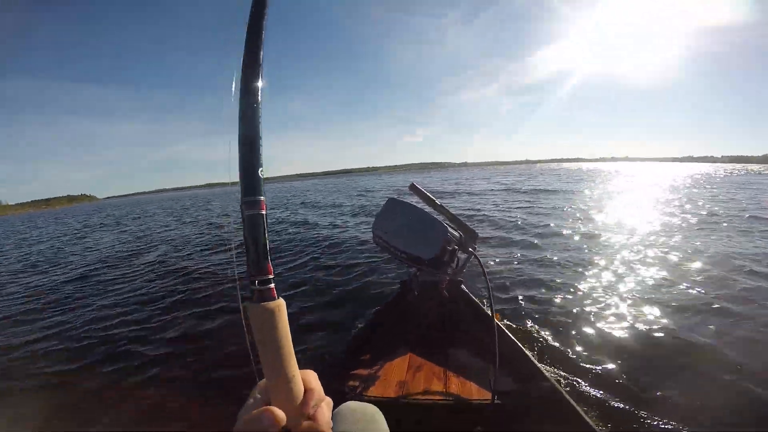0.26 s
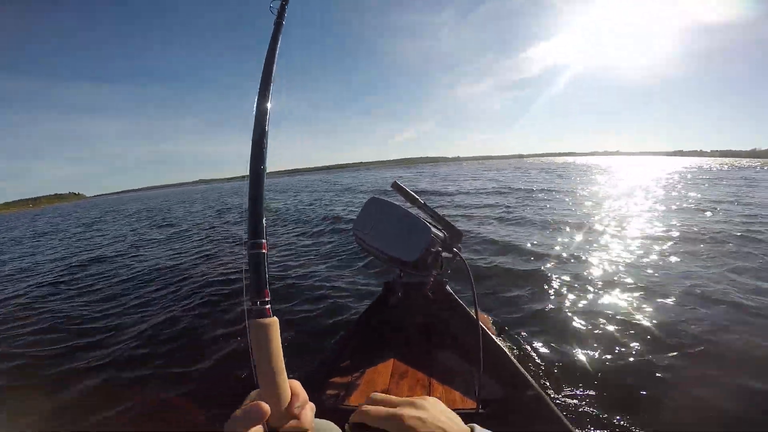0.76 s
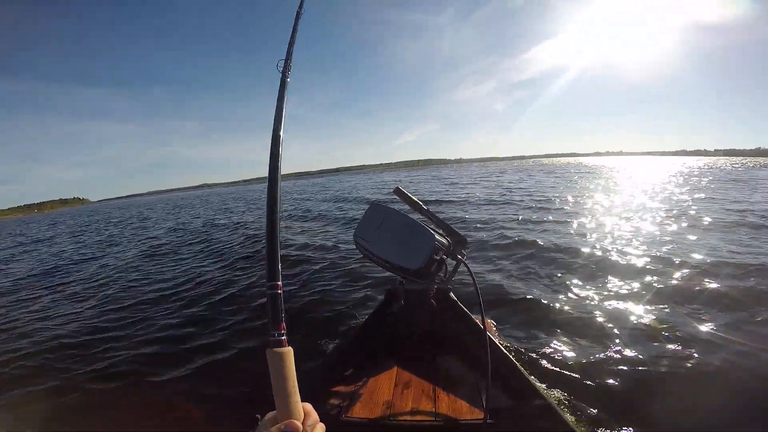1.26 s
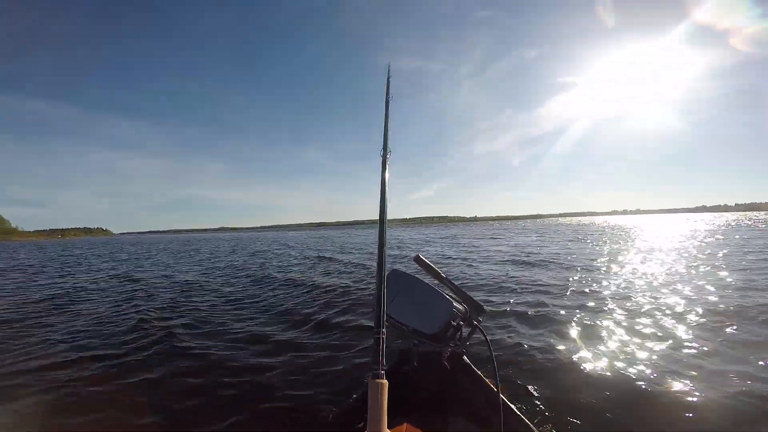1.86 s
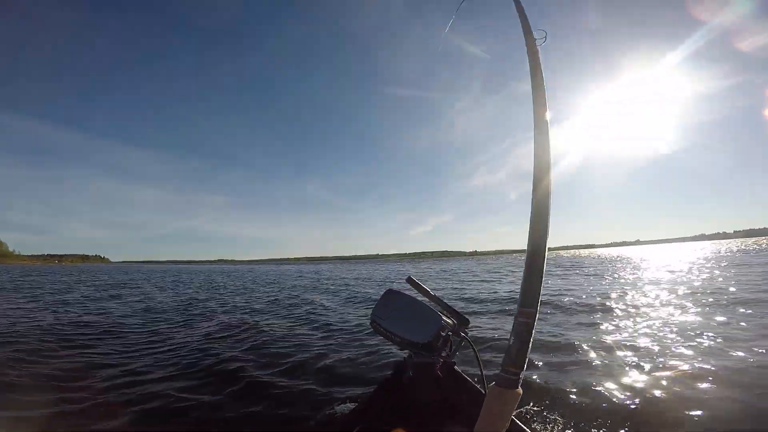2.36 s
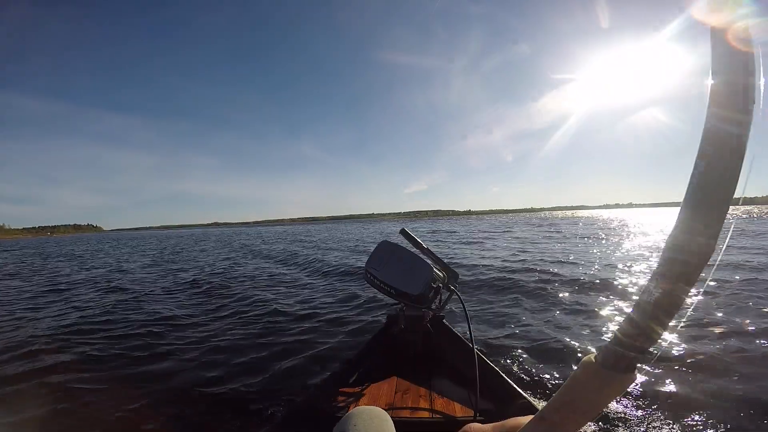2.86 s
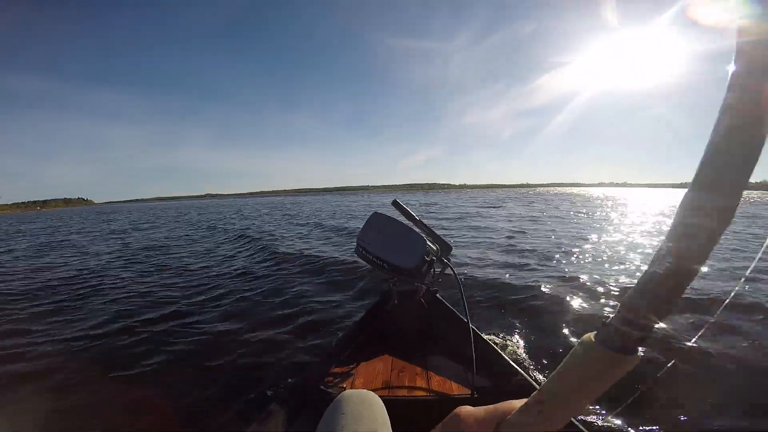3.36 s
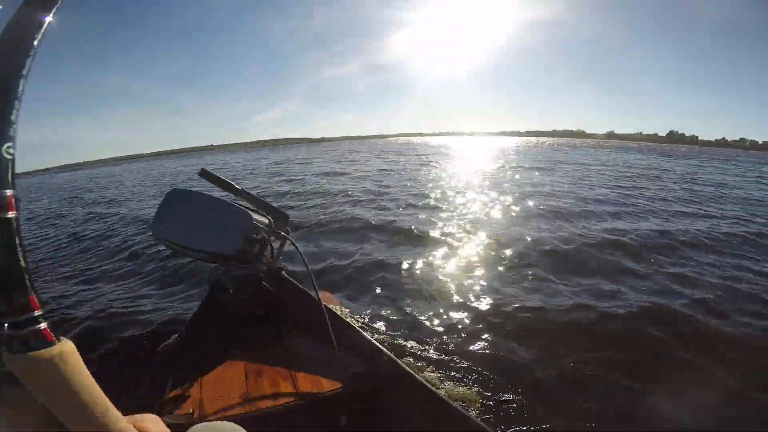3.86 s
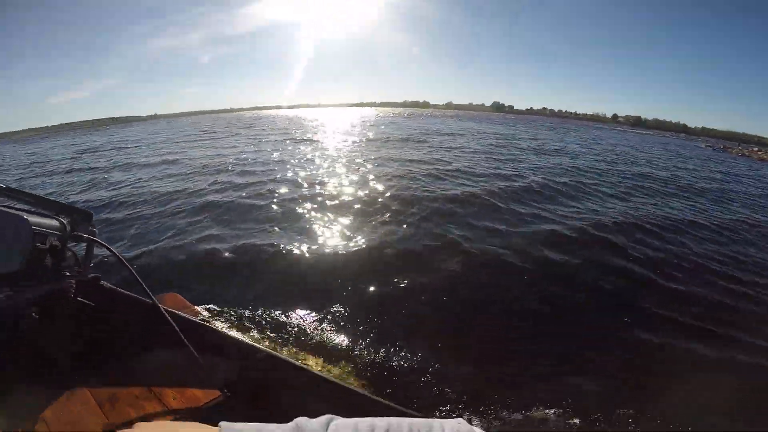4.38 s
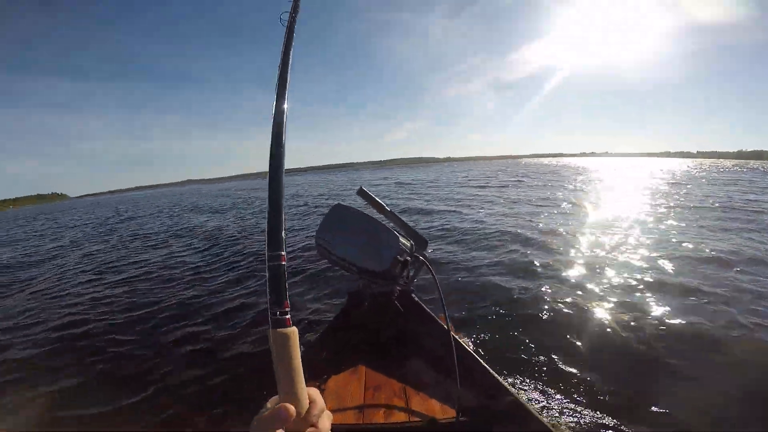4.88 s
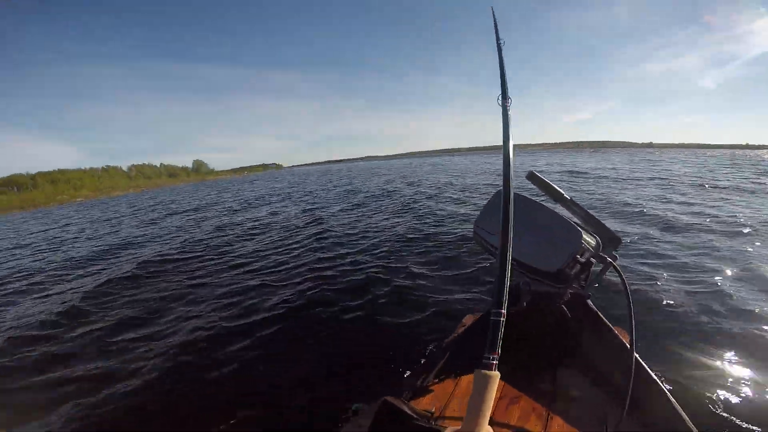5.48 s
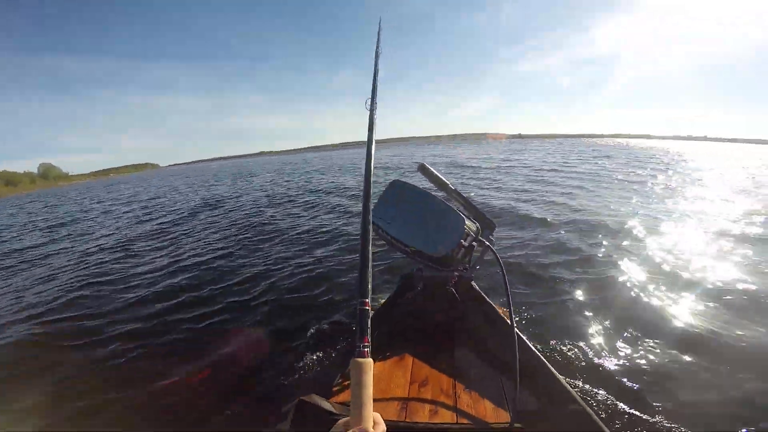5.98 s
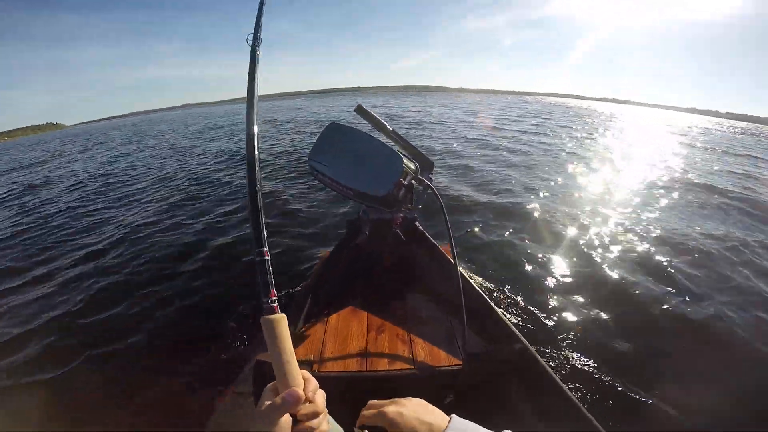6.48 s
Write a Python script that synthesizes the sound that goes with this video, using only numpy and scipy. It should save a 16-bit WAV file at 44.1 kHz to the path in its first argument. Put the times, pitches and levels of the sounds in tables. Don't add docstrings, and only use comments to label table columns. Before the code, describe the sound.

A fishing reel clicker buzzes metallically as line runs out, stops, then screams again, over gusty wind thumps and water plopping along a small boat's hull.

```python
import sys
import numpy as np
from scipy import signal
from scipy.fft import rfft, irfft, next_fast_len
from scipy.io import wavfile
from scipy.ndimage import uniform_filter1d, map_coordinates

SR = 44100
rng = np.random.default_rng(int(sys.argv[2]) if len(sys.argv) > 2 else 0)


def waveform_to_disk(signal):
    frames = np.transpose(np.atleast_2d(signal))
    scaled = np.clip(frames, -1, 1) * 32767
    samples = np.round(scaled).astype(np.int16)
    wavfile.write(sys.argv[1], SR, samples)


def linear_from_db(decibels):
    return 10 ** (np.asarray(decibels, float) / 20)


N = 296793
TIME = np.arange(N) / SR

# t/s, pull/dB, rod swing/0-1, camera turned away/0-1
HOLD = [(0.0, -39, 0.28, 0), (0.68, -39, 0.24, 0.26), (1.2, -41.5, 0.24, 0.18), (1.75, -42, 0.12, 0.25),
        (2.1, -47, 0.17, 0.02), (3.54, -37.5, 0.15, 0.14), (3.62, -42, 0.34, 0.1),
        (3.67, -36.5, 0.67, 0.26), (3.76, -37, 0.64, 0.03), (3.88, -38.5, 0.25, 0),
        (4.15, -39.5, 0.13, 0.83), (4.55, -39, 0.17, 0.87), (4.7, -40.5, 0.17, 0.26),
        (5.1, -40, 0.22, 0.14), (5.45, -42, 0.8, 0.16), (6.1, -42, 0.23, 0.24), (6.4, -42.5, 0.02, 0.04),
        (6.73, -43, 0.1, 0)]


def unit(x):
    return x / np.sqrt(np.mean(x ** 2) + 1e-20)


def curves(rows):
    s, *cols = np.transpose(rows)
    return [np.interp(TIME, s, c) for c in cols]


def wobble(rate):
    return map_coordinates(rng.standard_normal(int(N * rate / SR) + 4), [TIME * rate])


def filtered(x, response):
    m = next_fast_len(N + SR // 2)
    return irfft(rfft(x, m) * response(np.fft.rfftfreq(m, 1 / SR)), m)[:N]


def coloured(spectrum):
    hz, db = np.transpose(spectrum)
    response = lambda f: linear_from_db(np.interp(np.log(f + 1), np.log(hz), db))
    return unit(filtered(rng.standard_normal(N), response))


def ring(x, pitch_hz, width_hz):
    return signal.lfilter(*signal.iirpeak(pitch_hz, pitch_hz / width_hz, SR), x)


def resonant(x, modes):
    return sum((-1) ** k * linear_from_db(db) * ring(x, hz, width_hz) for k, (hz, width_hz, db) in enumerate(modes))


def placed(events, shape):
    out = np.zeros(N + SR)
    for row in events:
        sound = shape(row)
        out[round(row[0] * SR):][:len(sound)] += sound
    return out[:N]


def peaks(rows, rise_db_s, fall_db_s):
    total = 0
    for s, held_s, db in rows:
        before_s = np.maximum(s - TIME, 0)
        after_s = np.maximum(TIME - s - held_s, 0)
        total = total + linear_from_db(2 * (db - rise_db_s * before_s - fall_db_s * after_s))
    return total


def speed():
    # start/s, stop/s
    line_runs = [
        (0, 2.057),
        (3.533, 6.4),
        (6.514, 6.73),
    ]
    fastest_s = [
        [-.19, .03, .25, .46, .675, .885, 1.09, 1.3, 1.53, 1.72, 2.1],
        [3.33, 3.69, 3.89, 4.09, 4.29, 4.49, 4.68, 4.88, 5.075, 5.27, 5.485, 5.72, 5.98, 6.22, 6.6],
        [6.27, 6.54, 6.84],
    ]
    teeth_per_turn = 50
    surge_share, second_harmonic_share = .13, .04
    rate, surge = np.zeros((2, N))
    for (start, stop), turns in zip(line_runs, map(np.array, fastest_s)):
        running = (TIME >= start) * (TIME < stop)
        angle = 2 * np.pi * np.interp(TIME, turns, np.arange(len(turns)))
        swing = (surge_share * np.cos(angle) + second_harmonic_share * np.cos(2 * angle)) * running
        mean_rate = np.interp(TIME, (turns[1:] + turns[:-1]) / 2, teeth_per_turn / np.diff(turns))
        rate += mean_rate * (1 + swing) * running
        surge += swing
    return rate, surge


def beamed(x, part, aim_hz):
    spread = .09
    flutter_db, flutter_per_s = 2.5, 14
    gains = [linear_from_db(db) * (np.exp(-((aim_hz / hz - 1) / spread) ** 2) + .2) for hz, width_hz, db in part]
    total = np.sqrt(sum(g * g * width_hz for g, (hz, width_hz, db) in zip(gains, part)))
    out = np.zeros(N)
    for k, (gain, (hz, width_hz, db)) in enumerate(zip(gains, part)):
        flicker = linear_from_db(flutter_db * wobble(flutter_per_s))
        tone = ring(ring(x, hz, 4 * width_hz), hz, width_hz)
        out += (-1) ** k * gain * flicker * tone
    return unit(out / total)


def reel():
    # t/s, peak/dB
    lone_teeth = [(2.066, -26), (2.079, -31), (2.099, -27), (3.509, -41), (3.5154, -32), (3.5244, -31.5),
                  (6.41, -29), (6.4194, -30), (6.4617, -53), (6.4939, -27.5), (6.5051, -24.5)]
    # f/Hz, width/Hz, level/dB
    frame_modes = [(2740, 93, -7.5), (3090, 220, -11), (3703, 190, 1.5), (4020, 500, 2), (4353, 175, 7.5)]
    spool_modes = [(4825, 203, 2), (5370, 113, -4.5), (5730, 187, -3.5), (6610, 680, -0.5)]
    spring_modes = [(7046, 228, 0), (7857, 570, -4.5), (8590, 240, 2.5), (8950, 390, 0.5), (10340, 920, -2)]
    edge_modes = [(11440, 380, -0.3), (12100, 1050, -1.4), (13300, 430, 0.58), (14100, 1000, 2),
                  (15400, 1300, -0.78)]
    # over pull/dB, per swing/dB, per turning away/dB, per share of surge/dB
    part_levels = [
        (-0.5, 2, -12.5, 16),
        (0, 0, -0.5, -2),
        (-1, 5, 0.5, 8),
        (-14.5, -1, -0.5, 11),
    ]
    # at rest/Hz, per swing/Hz, per turning away/Hz
    beam_pitches = [
        (5133, -50, 328),
        (7100, 1200, -100),
        (11960, 500, 1200),
    ]
    # t/s, strength/0-1
    jerk_events = [
        (0.0, 0.03),
        (3.52, 0.9),
        (6.5, 0.25),
    ]
    jerk_gains = [0.5, 6.5, 0.5, -4]
    jerk_decay_s, jerk_spool_hz = 0.13, 495
    scatter_db, jitter_s = 1.7, .00003
    proud_every, proud_db = 6, 1.5
    spool_gear_db, edge_gear_db = 3.5, 3
    rattle_s, rattle_rise_s, hull_s = .003, 0.00037, .045

    rate, surge = speed()
    at = np.flatnonzero(np.diff(np.floor(np.cumsum(rate) / SR)))
    at = np.concatenate([at, [round(s * SR) for s, db in lone_teeth]])
    luck = rng.standard_normal((len(at), 2))
    proud = np.arange(len(at)) % proud_every == 0
    size = linear_from_db(scatter_db * luck[:, 0] + proud_db * proud)
    size = size / np.sqrt(np.maximum(rate[at], 110) / 200)
    size[-len(lone_teeth):] = linear_from_db([db + 30.5 for s, db in lone_teeth])
    at = np.clip(at + (jitter_s * SR * luck[:, 1]).astype(int), 0, N - 1)
    teeth = np.bincount(at, size, N)

    t = TIME[:600]
    shape = linear_from_db(-60 * t / rattle_s) * (1 - np.exp(-t / rattle_rise_s))
    flick = signal.fftconvolve(teeth, shape)[:N]
    burst = rfft(shape * rng.standard_normal(len(t)))
    repeated = np.linalg.norm(shape) * irfft(burst / np.abs(burst))
    same = signal.fftconvolve(teeth, repeated)[:N]
    hull_power = signal.fftconvolve(teeth ** 2, linear_from_db(-120 * TIME[:3000] / hull_s))[:N]
    answer = np.sqrt(np.abs(hull_power))

    def blows(wet_db):
        return 1.1 * same + (.6 * flick + linear_from_db(wet_db) * answer) * rng.standard_normal(N)

    pull_db, swing, away = curves(HOLD)
    jerk = np.zeros(N)
    for s, strength in jerk_events:
        jerk += strength * np.exp(-np.abs(TIME - s) / jerk_decay_s) * (TIME > s)
    frame_db, spool_db, spring_db, edge_db = (
        pull_db + db + a * swing + b * away + c * surge + d * jerk
        for (db, a, b, c), d in zip(part_levels, jerk_gains))
    gear = np.cos(2 * np.pi * np.cumsum(rate) / SR / proud_every)
    spool_db = spool_db + spool_gear_db * gear
    edge_db = edge_db + edge_gear_db * gear
    spool_hz, spring_hz, edge_hz = (hz + a * swing + b * away for hz, a, b in beam_pitches)
    spool_hz = spool_hz + jerk_spool_hz * jerk

    frame = linear_from_db(frame_db - 0.5) * unit(resonant(blows(wet_db=-16.5), frame_modes))
    spool = linear_from_db(spool_db + 1.5) * beamed(blows(wet_db=-25), spool_modes, spool_hz)
    spring = linear_from_db(spring_db - 0.5) * beamed(blows(wet_db=-22.5), spring_modes, spring_hz)
    edge = linear_from_db(edge_db + 3.0) * beamed(blows(wet_db=-24), edge_modes, edge_hz)
    return frame + spool + spring + edge


def thump(row):
    s, suck_db, swing_back_db = row
    dip_s, sink_s, release_s = .011, 0.0049, 0.0021
    ring_hz, ring_s, ring_rise_s = 24, .05, 0.0024
    t = TIME[:SR // 4]
    late = np.maximum(t - dip_s, 0)
    dip = -np.exp(-np.where(t < dip_s, ((t - dip_s) / sink_s) ** 2, (late / release_s) ** 2))
    swell = np.exp(-late / ring_s) * (1 - np.exp(-late / ring_rise_s))
    swing_back = linear_from_db(swing_back_db) * np.sin(2 * np.pi * ring_hz * late) * swell
    return linear_from_db(suck_db + 4) * (dip + swing_back)


def wind():
    # f/Hz, density/dB per Hz
    buffet_spectrum = [(7.1, -18), (12, 1.5), (27, 2), (37, -0.5), (46, -9.5), (60, -16), (123, -58),
                       (209, -41), (300, -50.5), (390, -104), (660, -120)]
    hiss_spectrum = [(60, 6.5), (150, 2), (300, -6), (450, -7.5), (610, -4.5), (800, -11.5), (1030, -4),
                     (1250, -11.5), (1470, -6.5), (2100, -12), (2650, -10.5), (3400, -20), (6000, -38)]
    # t/s, suck/dB, swing-back over suck/dB
    drops = [(0.002, -30, 18), (0.354, -36, 17), (0.436, -32, 17), (0.504, -36, 17), (0.572, -32, 18.5),
             (0.853, -35, 16), (1.394, -38, 14), (1.486, -37.5, 13.5), (1.577, -30.5, 20),
             (1.786, -34, 14.5), (2.924, -39, -4), (3.748, -36, 17), (3.839, -22, 8), (4.188, -23.5, 16),
             (4.382, -16, 7.5), (4.575, -22.5, 14), (4.671, -29.5, 14), (4.795, -36, 13),
             (4.864, -33.5, 14.5), (5.035, -36, 14), (5.121, -17.5, 9.5), (5.259, -33.5, 13),
             (5.44, -54, 2), (5.821, -31, 3), (5.998, -18.5, 10.5), (6.215, -37.5, -4), (6.512, -28, 9.5),
             (6.609, -17.5, 9)]
    # t/s, peak/dB
    cover_snaps = [
        (3.7938, -39),
        (3.843, -15),
        (4.404, -18),
        (4.4375, -10.5),
        (4.6003, -13.5),
        (4.6307, -15),
        (6.6586, -24),
        (6.695, -14),
    ]
    # t/s, strength/dB
    breeze_curve = [(0.0, -26.5), (0.3, -25.5), (0.55, -23.5), (1.2, -30), (1.4, -40), (1.6, -22),
                    (2.0, -30), (2.2, -42), (2.55, -38), (3.4, -42), (3.85, -22), (4.14, -27), (4.5, -25.5),
                    (5.2, -20), (5.64, -38.5), (5.9, -28.5), (6.2, -37), (6.6, -17.5)]
    # t/s, peak/dB
    eddies = [(0.09, -17.5), (0.3, -22), (0.68, -22), (0.95, -23.5), (1.151, -21.5), (1.309, -22.5),
              (1.44, -22), (1.55, -17), (1.7, -21), (1.9, -29), (2.23, -30.5), (2.53, -36), (2.81, -34),
              (3.88, -12), (4.0, -23), (4.22, -18), (4.299, -11), (4.46, -12), (4.61, -20), (4.7, -11),
              (4.831, -15), (4.918, -17), (5.17, -10), (5.28, -12.5), (5.359, -23), (5.49, -17),
              (5.73, -24), (5.92, -24), (6.03, -13), (6.65, -24)]
    # t/s, held/s, level/dB
    puffs = [(0.0, 0.02, -46), (0.39, 0, -47), (1.44, 0.021, -49), (1.84, 0, -53), (2.08, 0.0048, -49.5),
             (3.795, 0, -36), (3.84, 0.0075, -31), (4.2, 0, -37), (4.23, 0.013, -35.5), (4.39, 0.0029, -32),
             (4.432, 0.043, -29.5), (4.52, 0, -42), (4.56, 0.082, -33.5), (4.7, 0, -37.5), (4.77, 0, -40.5),
             (4.82, 0, -32), (5.0, 0.0057, -39), (5.1, 0, -44), (5.14, 0, -37), (5.79, 0.024, -46),
             (5.835, 0, -40), (5.96, 0.0019, -43), (5.995, 0.019, -40.5), (6.22, 0, -49),
             (6.37, 0.0055, -50), (6.462, 0.011, -45.5), (6.5, 0.0073, -41.5), (6.54, 0.0089, -38),
             (6.6, 0.031, -39.5), (6.69, 0.01, -45)]
    eddy_rise_db_s, eddy_fall_db_s = 250, 225
    puff_rise_db_s, puff_fall_db_s = 700, 900
    hiss_under_db, hiss_follows = -57, 0.52
    steady, flutter_db, flutter_per_s = 0.28, 3.0, 130
    snap_s = 0.0077
    travel = .55

    push = coloured(buffet_spectrum)
    envelope = np.abs(signal.hilbert(push, next_fast_len(N))[:N])
    push = unit(push / envelope ** steady)
    dip_shape = lambda row: min(linear_from_db(row[1] + row[2] + 20), .85) * signal.windows.tukey(SR // 10)
    push = push * (1 - np.minimum(placed(drops, dip_shape), .85))
    hiss = unit(linear_from_db(flutter_db * wobble(flutter_per_s)) * coloured(hiss_spectrum)) * linear_from_db(4)
    snap = lambda row: linear_from_db(row[1] - 60 * TIME[:400] / snap_s) * rng.standard_normal(400)
    snaps = 1.54 * resonant(placed(cover_snaps, snap), [(2780, 880, 5), (8600, 1500, -1.5)])

    breeze_db, = curves(breeze_curve)
    shove_power = linear_from_db(2 * breeze_db) + peaks([(s, 0, db) for s, db in eddies], eddy_rise_db_s, eddy_fall_db_s)
    hiss_power = linear_from_db(2 * (hiss_under_db + hiss_follows * (breeze_db + 30)))
    hiss_power = hiss_power + peaks(puffs, puff_rise_db_s, puff_fall_db_s)
    slow = np.sqrt(shove_power) * push + placed(drops, thump)
    limited = slow / (1 + (slow / travel) ** 4) ** .25
    return limited + np.sqrt(hiss_power) * hiss + snaps


def slap(row):
    t = TIME[:500]
    return linear_from_db(row[1] + 3 - 60 * t / .01) * (1 - np.exp(-t / .0008)) * rng.standard_normal(len(t))


def plop(row):
    s, db, pitch_hz = row
    turns = TIME[:700] * pitch_hz
    swell = np.exp(-turns / 5) * (1 - np.exp(-turns / 1.5))
    return linear_from_db(db - 2.5) * np.sin(2 * np.pi * turns * (1 + 0.0041 * turns)) * swell


def water():
    # t/s, peak/dB, f/Hz
    hull_plops = [(0.046, -23, 1590), (0.39, -28, 1320), (0.612, -28, 1680), (0.6923, -26.5, 1610),
                  (1.4457, -26, 1260), (1.5374, -28, 1590), (1.6312, -25, 1580), (1.8317, -30, 1140),
                  (2.0607, -29, 1740), (2.2213, -34, 1700), (3.3997, -41, 1900), (4.017, -24, 1550),
                  (4.2343, -21, 1210), (4.3834, -32, 1090), (4.4694, -18, 1355), (4.6154, -13, 1780),
                  (5.1836, -21, 1440), (5.267, -23, 1590), (5.8308, -29, 1700), (6.4318, -27, 1660),
                  (4.375, -31, 2640), (4.57, -20, 2650), (4.7002, -21, 2490), (4.8145, -21, 2560),
                  (5.1244, -25.5, 2570), (5.1856, -22, 2580), (5.005, -32, 2600), (6.0, -27, 2600),
                  (6.5, -25, 2580)]
    # f/Hz, width/Hz, level/dB
    hull_modes = [(950, 570, -11.5), (1560, 204, 0.5), (1780, 287, 2), (2253, 45, -1.5), (2945, 510, 1),
                  (3870, 190, 1), (4790, 380, 1.5), (5490, 150, -3)]
    # t/s, strength/dB
    lapping = [(0.0, -46), (0.2, -58), (1.9, -55.5), (2.3, -60.5), (2.62, -54.5), (2.9, -59.5), (3.46, -58),
               (3.51, -48.5), (3.62, -55.5), (4.3, -52.5), (6.4, -57.5)]
    slap_modes = [(1090, 580, 0.99), (1700, 450, 0.87), (2580, 440, -1.4)]
    patchy_db, drips = 3, 900
    fizz_db = 0.5
    drone_db, drone_fizz_db = -11.5, -9.5

    z = signal.stft(rng.standard_normal(N), nperseg=512)[2]
    patches = uniform_filter1d(uniform_filter1d(rng.standard_normal(z.shape), 6, 0), 12, 1)
    wash = unit(signal.istft(z * linear_from_db(patchy_db * unit(patches)), nperseg=512)[1][:N])
    luck = rng.random((drips, 3))
    bubbles = np.c_[luck[:, 0] * N / SR, -3 + 9 * luck[:, 1], 700 * 7 ** luck[:, 2]]
    wash += placed(bubbles, plop)
    gurgle, fizz = unit(resonant(wash, hull_modes[:3])), unit(resonant(wash, hull_modes[3:]))

    lap = linear_from_db(curves(lapping)[0])
    running = uniform_filter1d(1. * (speed()[0] > 0), size=2000)
    drone = linear_from_db(curves(HOLD)[0]) * running
    low = np.hypot(lap, linear_from_db(drone_db) * drone) * gurgle
    high = np.hypot(linear_from_db(fizz_db) * lap, linear_from_db(drone_fizz_db) * drone) * fizz
    return low + high + placed(hull_plops, plop) + resonant(placed(hull_plops, slap), slap_modes)


def scene():
    return (reel() + wind() + water())[None]


def roll_off(x):
    return signal.sosfilt(signal.butter(12, 15750, fs=SR, output="sos"), x)


def record(dry):
    # f/Hz, width/Hz, level/dB
    case_colour = [(2120, 110, -1.5), (4453, 85, -4.5), (4880, 100, -3), (6074, 107, 4.5), (10760, 340, -4.5),
                   (12200, 320, -10)]
    # f/Hz, density/dB per Hz
    noise_spectrum = [(35, -32), (60, -2.5), (145, -15), (1090, -29), (1770, -34), (2570, -35), (2950, -24),
                      (4800, -48), (6050, -34), (15300, -44)]
    top_hz, noise_db = 15380, -56.0
    case = lambda f: linear_from_db(sum(db / (1 + ((f - hz) / width_hz) ** 2) for hz, width_hz, db in case_colour))
    band = lambda f: np.where(f < top_hz, 1, linear_from_db(-40))
    noisy = filtered(dry[0], case) + linear_from_db(noise_db) * coloured(noise_spectrum)
    return roll_off(filtered(noisy, band)[None])


dry = scene()
out = record(dry)
waveform_to_disk(out)
```